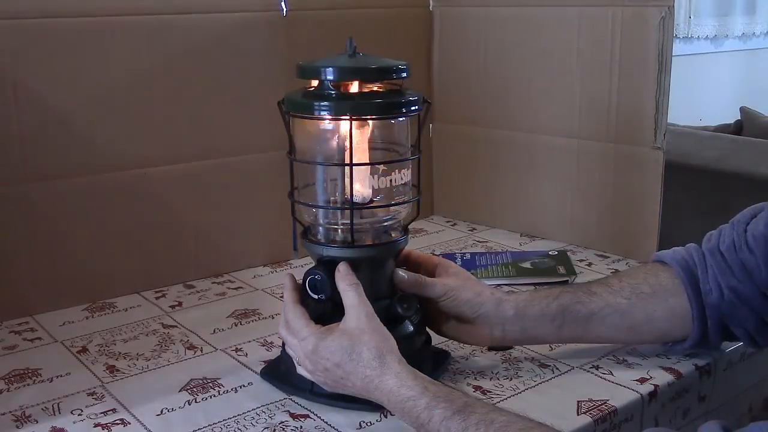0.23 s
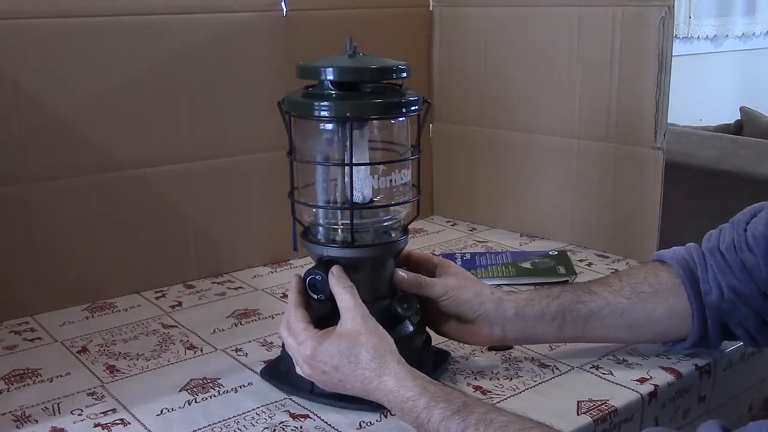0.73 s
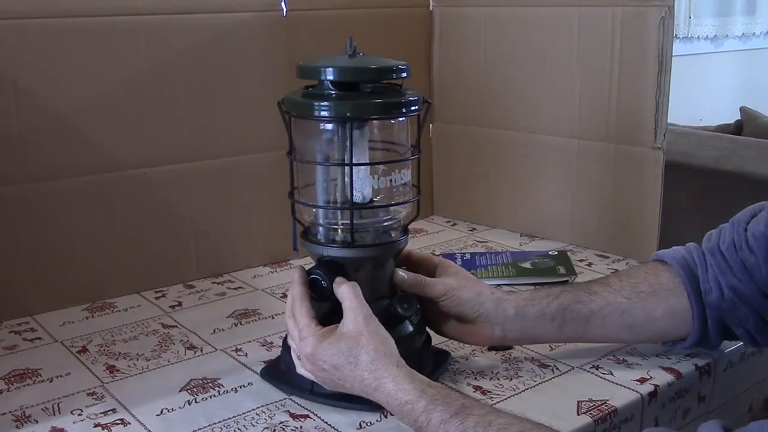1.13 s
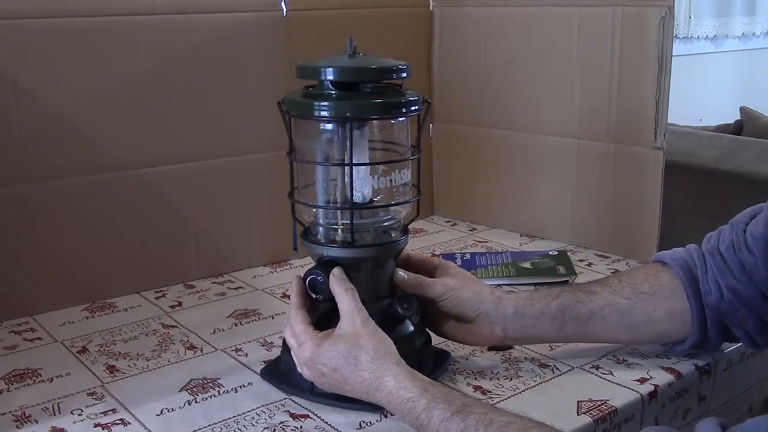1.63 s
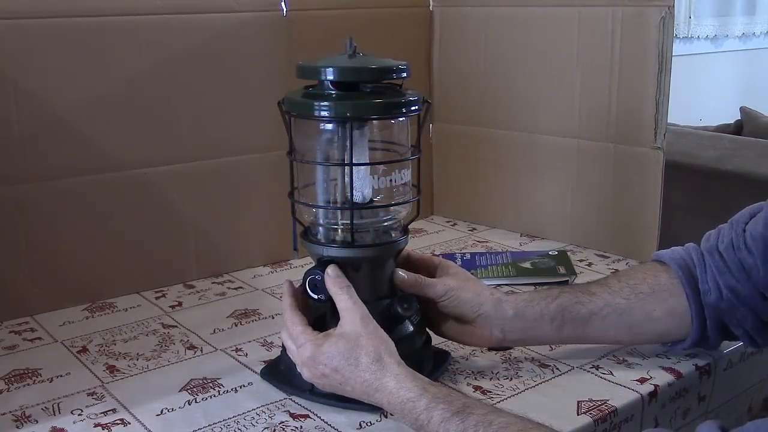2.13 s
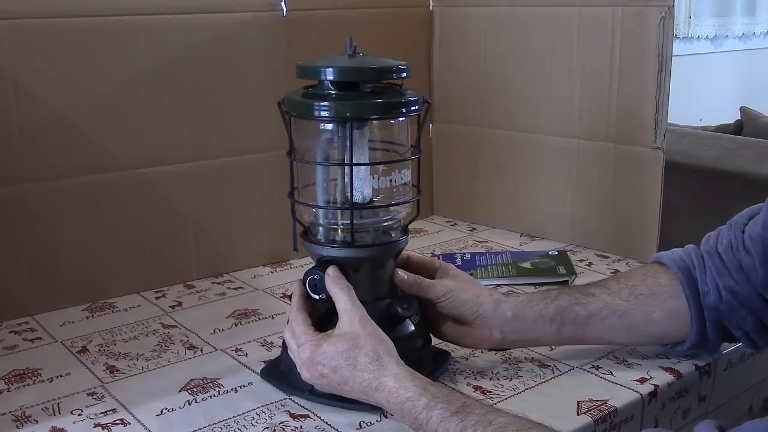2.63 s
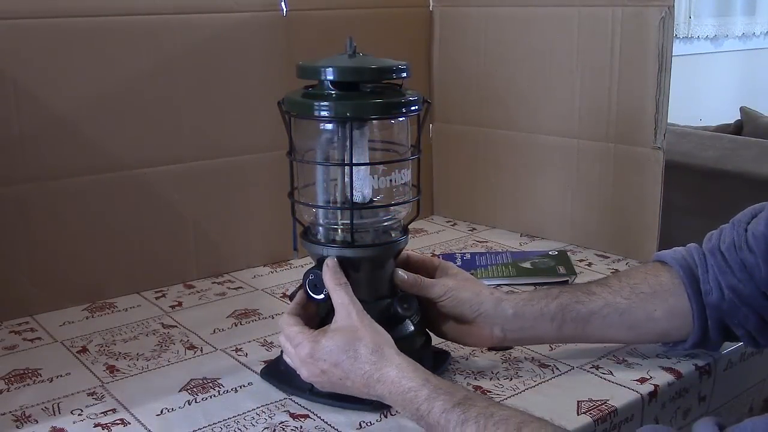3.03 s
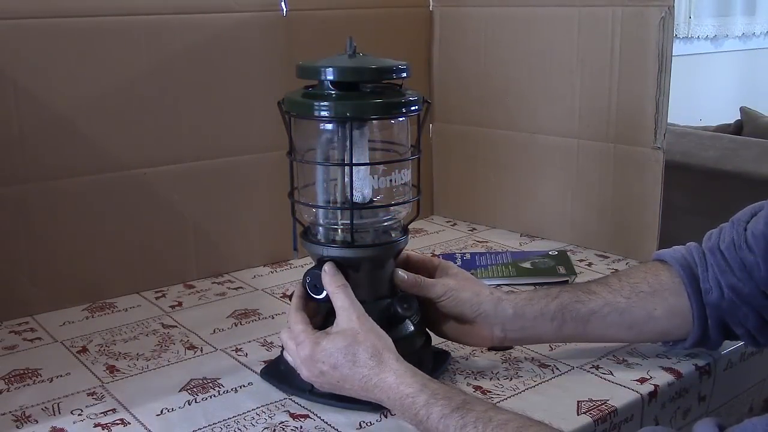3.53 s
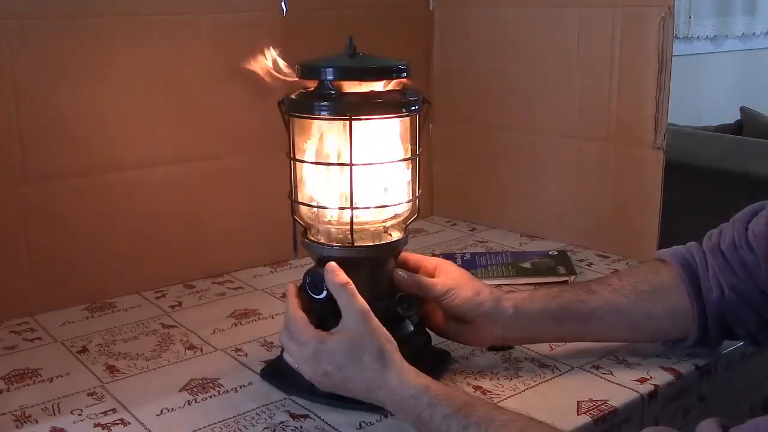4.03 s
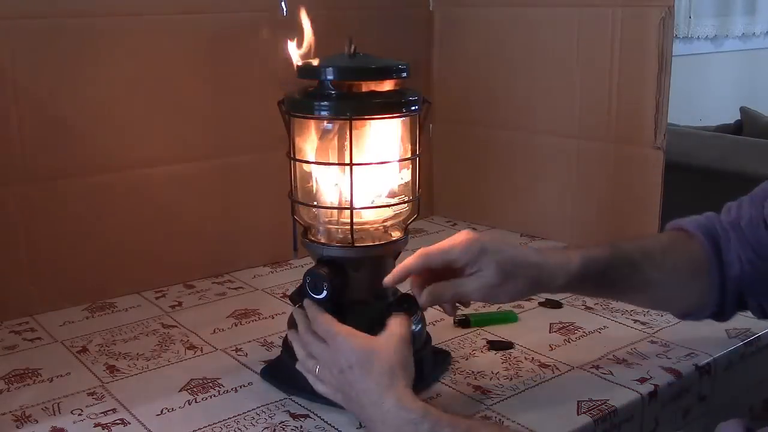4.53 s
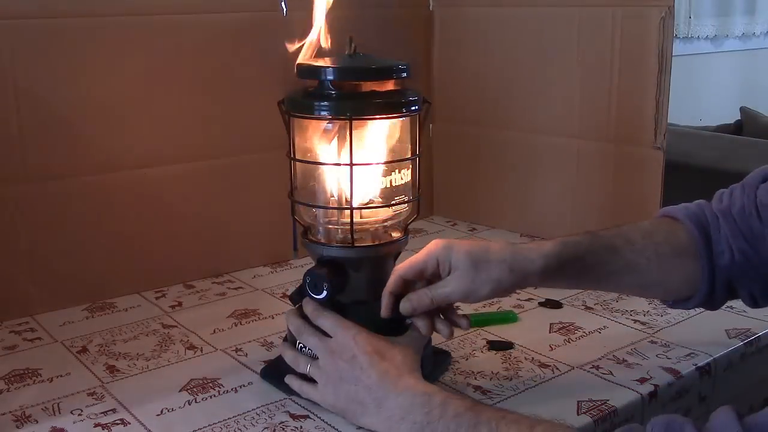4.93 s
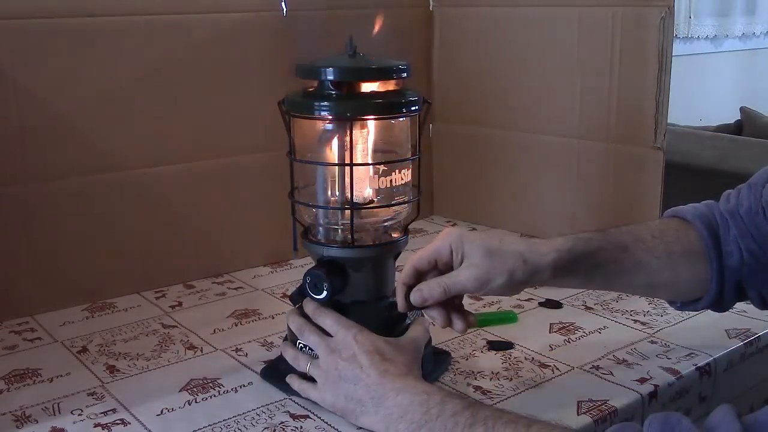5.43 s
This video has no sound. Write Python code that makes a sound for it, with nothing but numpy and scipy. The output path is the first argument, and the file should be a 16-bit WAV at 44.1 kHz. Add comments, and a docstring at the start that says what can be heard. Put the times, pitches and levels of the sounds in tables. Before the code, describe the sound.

Close indoor sound of sharp repeated sparks, hissing fuel lighting in a soft whoomp, brief flame flutter, then a metallic pump knock and creak.

```python
"""A faint hiss of fuel dies away over a quiet room, then fingers tap and rub a button on a gas lantern.
An igniter sparks about eight times a second, with one pause: noise bursts echo in the globe and shake the frame.
The valve opens: fuel roars as noise in many resonances and catches with a whoomp of rising pitch; a flame flutters.
Then a hand works the pump: filtered noise scrapes and whistles, a knock rings the tank, and the knob creaks.
"""
import sys
import numpy as np
from scipy import signal
from scipy.fft import rfft, irfft
from scipy.io import wavfile
from scipy.ndimage import uniform_filter1d, map_coordinates

SR = 44100
rng = np.random.default_rng(int(sys.argv[2]) if len(sys.argv) > 2 else 0)


def file_out(sig):
    """Save sig as 16-bit WAV at sys.argv[1]."""
    # one column per channel
    cols = np.atleast_2d(sig).T
    # limit, then scale
    lim = np.clip(cols, -1, 1)
    pcm = np.round(lim * 32767).astype(np.int16)
    wavfile.write(sys.argv[1], SR, pcm)


N = 250047
T = np.arange(N) / SR  # time of every sample, in seconds

# blows of the pump at the end of its stroke: start_s [s], peak_db [dB]
KNOCKS = [(5.146, -16)]
# resonances of the fuel tank: pitch_hz [Hz], relative level_db [dB], t60_s [s]
TANK_MODES = [(461.4, 4, 0.39), (703, 5.5, 0.21), (1180, 12, 0.17), (1250, -20, 0.41), (1360, -4, 0.51),
              (1790, -13, 0.23), (2430, -19, .2), (2750, -17, .25), (2880, -27, 0.24)]


def undb(db):
    """Turn decibels into a plain gain."""
    return 10 ** (np.asarray(db) / 20)


def unit(x):
    """Scale a sound to an rms level of 1."""
    return x / np.sqrt(np.mean(x ** 2))


def fade(t, t60):
    """Exponential decay, 60 dB down after t60 seconds."""
    return np.exp(-np.log(1000) * t / t60)


def swell(start, attack, hold, t60, db):
    """Gain that rises smoothly, holds, then dies away."""
    rise = np.clip((T - start) / attack, 0, 1)
    since_hold = np.maximum(T - start - attack - hold, 0)
    return undb(db) * rise ** 2 * fade(since_hold, t60)


def walk(rate):
    """Random levels, each held for 1 / rate seconds and smoothed twice; rms 1."""
    k = int(SR / rate)
    steps = np.repeat(rng.standard_normal(N // k + 1), k)
    smooth = uniform_filter1d(uniform_filter1d(steps, k), k)
    return unit(smooth[:N])


def curve(rows, lead_s=0):
    """Level in dB over time, silent outside its rows."""
    s, db = np.transpose(rows)
    return np.interp(T + lead_s, s, db, left=-200, right=-200)


def colour(x, points):
    """Filter to the gain of (Hz, dB) points without ringing ahead of the sound, using the cepstrum."""
    hz, db = np.transpose(points)
    grid = np.linspace(1, SR / 2, 2049)
    gain_db = np.interp(np.log(grid), np.log(hz), db)
    ceps = irfft(np.log(undb(gain_db)))
    # fold the second half onto the first, so the filter only looks back
    ceps[1:2048] *= 2
    ceps[2049:] = 0
    response = irfft(np.exp(rfft(ceps)))
    return signal.fftconvolve(x, response)[:len(x)]


def band(hz, width, passes=1, size=N):
    """Noise in one resonance, gain 1 at its centre; two passes give steep flanks."""
    x = rng.standard_normal(size)
    sharpness = max(hz / width, .5)
    for _ in range(passes):
        x = signal.lfilter(*signal.iirpeak(min(hz, .45 * SR), sharpness, fs=SR), x)
    return x


def gliding(hz, width_hz):
    """Noise in a resonance whose centre moves: slow noise shifted up to the wanted pitch."""
    turn = 2 * np.pi * np.cumsum(hz) / SR
    low_pass = signal.butter(3, width_hz, fs=SR)
    sound = 0
    for wave in (np.sin, np.cos):
        sound = sound + signal.lfilter(*low_pass, rng.standard_normal(N)) * wave(turn)
    return unit(sound)


def ring(modes, t, spread_db):
    """One blow on a set of resonances, each with a little chance in level and pitch."""
    sound = 0
    for hz, db, t60 in modes:
        level_luck, pitch_luck = rng.standard_normal(2)
        tone = np.sin(2 * np.pi * hz * (1 + 0.00078 * pitch_luck) * t)
        sound = sound + undb(db + spread_db * level_luck) * fade(t, t60) * tone
    return sound


def echoes(t, near_s, room_db, grain):
    """A dense burst of near reflections, then the room, whose treble dies first."""
    low_t60_s, high_t60_s = 0.51, 0.19
    dull = signal.lfilter([.3], [1, -.7], grain)
    room_part = dull * fade(t, low_t60_s) + (grain - dull) * fade(t, high_t60_s)
    return grain * fade(t, near_s) + undb(room_db) * room_part


def peak(x):
    """Peak height, taken as 2.4 times the rms of the loudest 160 samples."""
    return 2.4 * np.sqrt(uniform_filter1d(x ** 2, size=160).max())


def add(out, at, sound, db):
    """Mix a sound in at a time in seconds with a given peak in dB."""
    i = int(at * SR)
    sound = sound[:N - i]
    out[i:i + len(sound)] += sound * undb(db) / peak(sound)


def room():
    """Steady room tone and microphone hiss, swelling a little, with a faint whistle in irregular pips."""
    # colour of the room tone: pitch_hz [Hz], relative level_db [dB]
    room_colour = [(15, -57), (25, -12.5), (160, -12.5), (421, -4), (457, -2), (945, -3.5), (1020, -4.5),
                   (1380, -4), (3830, -13), (5430, -15), (5880, -16), (10100, -19.5), (15500, -28.5)]
    tone_db, whine_db = -60, -72
    whine_hz, pips_per_s = 5562, 9.5
    tone = unit(colour(rng.standard_normal(N), room_colour))
    tone = tone * undb(tone_db + 0.23 * walk(2.32))
    pip_cycles = np.cumsum(pips_per_s * undb(2.5 * walk(6))) / SR
    pips = 1. * (np.cos(2 * np.pi * pip_cycles) > .1)
    pips = uniform_filter1d(pips, size=200)  # soften the edges
    return tone + undb(whine_db) * pips * np.sin(2 * np.pi * whine_hz * T)


def jet():
    """Turbulent fuel drives the resonances of tube and globe; each sputters on its own."""
    # fuel flow, one list for each opening of the valve: time_s [s], roar_db [dB]
    openings = [
        [(0, -63), (.2, -65), (.33, -87)],
        [(3.36, -82), (3.41, -49), (3.545, -44), (3.74, -46), (3.8, -40), (3.9, -45.5), (4.04, -41.5),
         (4.2, -42.5), (4.32, -45), (4.38, -42), (4.46, -50), (4.52, -50), (4.66, -53), (4.9, -68)],
    ]
    # resonances before the warmth shift and widening: pitch_hz [Hz], width_hz [Hz], relative level_db [dB]
    burner_modes = [(446, 46, -7.5), (592.4, 72, 2.5), (804, 78, -9.5), (1106, 68, -4), (1140, 200, -13.5),
                    (1404, 180, -14), (1996, 61, -8), (2420, 170, -11), (2584, 73, -2.5), (2797, 51, 0),
                    (3120, 170, -15.5), (3570, 130, -7), (5000, 140, -26), (5640, 88, -12),
                    (6540, 120, -6.5), (6740, 100, -9.5), (7360, 93, -2), (8030, 80, -22), (8600, 200, -12),
                    (9960, 76, -12), (10300, 110, -6.5), (10370, 170, -6), (11300, 50, -21),
                    (12100, 170, -30)]
    split_hz, broad_db = 1700, -28  # resonances below the split join the roar, the others the hiss
    roar = undb(broad_db) * band(480, 1100)
    hiss = undb(-17.0) * (band(2640, 2300) + band(8200, 8300))
    for hz, width, db in burner_modes:
        sputter_db = 0.59 * walk(8) + 3.2 * walk(30)
        mode = undb(db + sputter_db) * band(hz, 1.63 * width, 2)
        if hz < split_hz:
            roar = roar + mode
        else:
            hiss = hiss + mode

    # the tube is hot at first, cools while the valve is shut and warms again: the hiss follows in pitch
    cold_share, hot_share = .975, 1.012
    warms_from_s, warms_to_s = 3.55, 4.35
    shuts_s, opens_s = openings[0][-1][0], openings[1][0][0]
    share = np.interp(T, [shuts_s, opens_s, warms_from_s, warms_to_s],
                      [hot_share, cold_share, cold_share, hot_share])
    hiss = map_coordinates(hiss, [np.cumsum(share)], mode="mirror")

    hiss_at_45_db, hiss_per_roar, hiss_leads_s = -45, 1.03, 0.004  # dB at a -45 dB roar, dB per dB, s
    flow = 0
    for rows in openings:
        hiss_db = hiss_at_45_db + hiss_per_roar * (curve(rows, hiss_leads_s) + 45)
        flow = flow + undb(curve(rows)) * unit(roar) + undb(hiss_db) * unit(hiss)
    flutter = undb(0.5 * walk(24.74))
    return flutter * flow


def struck(events, modes):
    """Blows on a small part: its resonances ring along with a short burst of noise."""
    out, t = np.zeros(N), T[:int(.2 * SR)]
    for at, db in events:
        noise = undb(1) * fade(t, .05) * band(2800, 2500, size=len(t))
        add(out, at, ring(modes, t, spread_db=2) + noise, db)
    return out


def fingers():
    """A thumb rubs the button as noise, and fingers tap the button with a hollow ring."""
    # thumb pressing the button: start_s [s], attack_s [s], hold_s [s], release_t60_s [s], level_db [dB]
    rub = (1.46, .07, .08, .35, -54.5)
    # finger taps: start_s [s], peak_db [dB]
    taps = [(1.471, -45.5), (1.499, -46), (2.017, -44), (2.22, -47), (2.286, -32)]
    # resonances of the button: pitch_hz [Hz], relative level_db [dB], t60_s [s]
    button_modes = [(1148, 8.5, 0.055), (1407, -5, 0.092), (830, -28, .04), (2050, -12, 0.035),
                    (2670, -12, 0.034)]
    rubbing = swell(*rub) * undb(2.9 * walk(71.4)) * unit(band(1240, 430))
    return rubbing + struck(taps, button_modes)


def igniter():
    """Each spark is a sharp crack that bounces in the globe and shakes the frame; sparks vary in brightness."""
    # sparks: start_s [s], peak_db [dB], bass thump_db relative to the crack [dB]
    sparks = [(1.536, -20.5, -29), (1.6611, -18, -50), (1.7875, -18, -34), (1.9117, -20, -29),
              (2.314, -20, -32), (2.4381, -17.5, -34.5), (2.563, -18, -34), (2.6864, -17, -41),
              (2.812, -18, -27.5), (2.9367, -19.5, -34), (3.063, -19.5, -34), (3.1885, -20, -32),
              (3.3135, -18.5, -39), (3.44, -19, -37), (3.5652, -14, -28), (3.693, -14.5, -32),
              (3.8179, -13, -28), (3.944, -19.5, -31), (4.0718, -19.5, -37)]
    # colour of a spark: pitch_hz [Hz], relative level_db [dB]
    spark_colour = [(35, -49), (60, -27.5), (589, -7), (1090, -11), (2990, -7.5), (3280, -7), (4060, -9),
                    (5260, -9), (11200, -1.5), (15200, -7), (16700, -12)]
    # resonances of metal frame and burner tube: pitch_hz [Hz], width_hz [Hz], relative level_db [dB]
    frame_modes = [(1920, 39, -4.5), (3820, 90, -3.5), (5380, 130, 3.5), (5800, 75, -5), (6630, 80, -1.5),
                   (9370, 90, -3), (10070, 90, -7), (11200, 110, -8)]
    # direct crack, then reflections inside the globe: delay_s [s], extra level_db [dB]
    bounce_rows = [(.0006, 3), (.004, -1), (.0085, -3)]
    frame_db, frame_t60_s = -30.5, 0.33
    globe_t60_s, room_db = .038, -13
    alike = .55  # share of the noise power that repeats spark after spark
    mean_cut_db, cut_spread_db = 3, 1.07  # cut below 9 kHz, and its scatter from spark to spark

    out, t = np.zeros(N), T[:int(.4 * SR)]
    same = rng.standard_normal(len(t))
    frame = unit(sum(undb(db) * unit(band(hz, width)) for hz, width, db in frame_modes))
    bounces = 1 + sum(undb(db) * np.exp(-((t - s) / 0.00017) ** 2) for s, db in bounce_rows)
    onset = np.minimum(t / 0.00082, 1)
    for at, db, thump_db in sparks:
        cut_db = mean_cut_db + cut_spread_db * rng.standard_normal()
        grain = np.sqrt(alike) * same + np.sqrt(1 - alike) * rng.standard_normal(len(t))
        crack = echoes(t, globe_t60_s, room_db, grain) * bounces * onset
        crack = colour(crack, spark_colour)
        crack = colour(crack, [(3000, -cut_db), (9000, 0)])  # full cut up to 3 kHz, none from 9 kHz
        crack = crack / peak(crack)
        thump = undb(thump_db) * np.exp(-((t - .004) / 0.0011) ** 2)  # one short push of air
        rattle = undb(frame_db) * fade(t, frame_t60_s) * frame[int(at * SR):][:len(t)]
        add(out, at + .0009, crack + thump + rattle, db)
    return out


def loose_part():
    """A loose metal part touches the frame and rings in small clinks."""
    # clinks: start_s [s], peak_db [dB]
    clinks = [(1.86, -35.5), (1.8793, -41)]
    # resonances of the part: pitch_hz [Hz], relative level_db [dB], t60_s [s]
    part_modes = [(1700, -12, 0.075), (2640, 1, 0.033), (2940, 0, 0.06), (3180, -8, .04), (3940, 1, 0.076)]
    return struck(clinks, part_modes)


def whoomp():
    """The gas in the globe lights all at once; the air heats up, so its note climbs, over a low rumble."""
    # the gas catches: start_s [s], attack_s [s], hold_s [s], release_t60_s [s], level_db [dB]
    catch = (3.738, .025, .055, .25, -33)
    cold_hz, hot_hz, heats_at_s, heating_s = 500, 760, 3.795, .015
    width_hz, flutter_db, rumble_db = 125, 1.5, -18
    rumble = undb(rumble_db) * unit(band(230, 240))
    heat = (1 + np.tanh((T - heats_at_s) / heating_s)) / 2  # 0 cold, 1 hot
    note_hz = cold_hz + (hot_hz - cold_hz) * heat
    flutter = undb(flutter_db * walk(70))
    return swell(*catch) * flutter * (gliding(note_hz, width_hz) + rumble)


def flame():
    """The flame flutters over the hood: low noise of wavering level."""
    # flutter: start_s [s], attack_s [s], hold_s [s], release_t60_s [s], level_db [dB]
    burning = (4.42, .13, .27, 1.2, -72)
    return swell(*burning) * undb(1.9 * walk(16)) * unit(band(214, 71, 2))


def pump():
    """The shaft scrapes the tank and air whistles past the cup; the tank rattles after the knock."""
    # movements: start_s [s], length_s [s], scrape_db [dB], air_db [dB], first air pitch_hz [Hz]
    movements = [(4.914, 0.022, -56.5, -62, 6700), (5.002, 0.12, -50.5, -54.5, 9100),
                 (5.173, .11, -67, -54.5, 8740), (5.35, 0.067, -60.5, -60, 8600),
                 (5.455, 0.195, -66, -59, 6700)]
    attack_s, scrape_t60_s, air_t60_s = 0.028, 0.19, 0.23
    air_sag_hz_per_s = 3800
    tank_rattle_db, tank_rattle_t60_s = -39.5, 0.48
    start, length, scrape_db, air_db, air_hz = np.transpose(movements)

    def strokes(levels_db, t60):
        """Gain over time of all the movements."""
        return sum(swell(s, attack_s, max(n - attack_s, 0), t60, db)
                   for s, n, db in zip(start, length, levels_db))

    scrape = sum(undb(db / 2) * band(hz, 170) for hz, db, _ in TANK_MODES)
    tank_rattle = sum(swell(at, 0.0078, 0, tank_rattle_t60_s, tank_rattle_db) for at, _ in KNOCKS)
    scrape_gain = (strokes(scrape_db, scrape_t60_s) + tank_rattle) * undb(2.0 * walk(60))

    now = np.maximum(np.searchsorted(start, T) - 1, 0)  # latest movement at each moment
    pitch_hz = air_hz[now] - air_sag_hz_per_s * np.maximum(T - start[now], 0)
    air = gliding(pitch_hz, 1060) + undb(0.5) * unit(band(5000, 14000))
    air_gain = strokes(air_db, air_t60_s) * undb(0.79 * walk(40))
    return scrape_gain * unit(scrape) + air_gain * unit(air)


def plunger():
    """The plunger knocks home: an echoing blow, a bright tick and the ring of the tank."""
    # colour of the blow: pitch_hz [Hz], relative level_db [dB]
    knock_colour = [(65, -61), (110, -47), (264, -10), (454, -6.5), (748, -7), (921, -14.5), (1340, -6),
                    (2120, -27), (2610, -22), (6670, -32.5), (8390, -25), (16000, -50)]
    out, t = np.zeros(N), T[:int(.5 * SR)]
    for at, db in KNOCKS:
        blow = colour(echoes(t, 0.077, -4, rng.standard_normal(len(t))), knock_colour)
        tick = undb(-2) * fade(t, 0.01) * band(7500, 3600, size=len(t))
        knock = blow / peak(blow) + tick + undb(-20.5) * ring(TANK_MODES, t, spread_db=4.0)
        # keep deep bass out of the knock
        knock = signal.lfilter(*signal.butter(2, 170, "high", fs=SR), knock)
        add(out, at - .001, knock, db)
    return out


def pump_knob():
    """The turning pump knob creaks in dry ticks: a very short bright burst over a longer, duller one."""
    # ticks: start_s [s], peak_db [dB]
    creaks = [(5.448, -42.5), (5.4537, -39.5), (5.47, -38), (5.483, -40.5), (5.4952, -44)]
    out, t = np.zeros(N), T[:int(.2 * SR)]
    for at, db in creaks:
        bright = fade(t, 0.0038) * band(8000, 14000, size=len(t))
        dull = undb(-2.5) * fade(t, 0.075) * band(2350, 1150, size=len(t))
        add(out, at, bright + dull, db)
    return out


def scene():
    """One microphone feeds both channels."""
    lantern = jet() + fingers() + igniter() + loose_part() + whoomp() + flame()
    mono = room() + lantern + pump() + plunger() + pump_knob()
    return np.array([mono, mono])


def record(dry):
    """The microphone loses the deepest bass and thins out near the top, then a steep cut."""
    top_hz = 16750
    soft = signal.sosfilt(signal.butter(1, 45, "high", fs=SR, output="sos"), dry)
    soft = signal.sosfilt(signal.cheby1(6, 1, 15500, fs=SR, output="sos"), soft)
    return signal.sosfilt(signal.ellip(10, .2, 60, top_hz, fs=SR, output="sos"), soft)


dry = scene()
out = record(dry)
file_out(out)
```